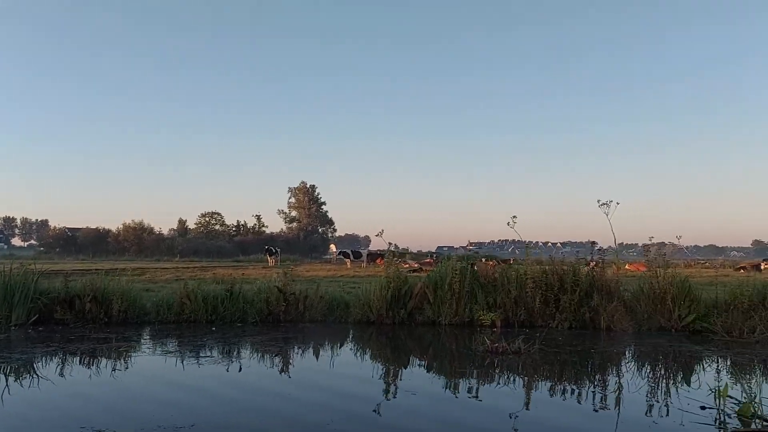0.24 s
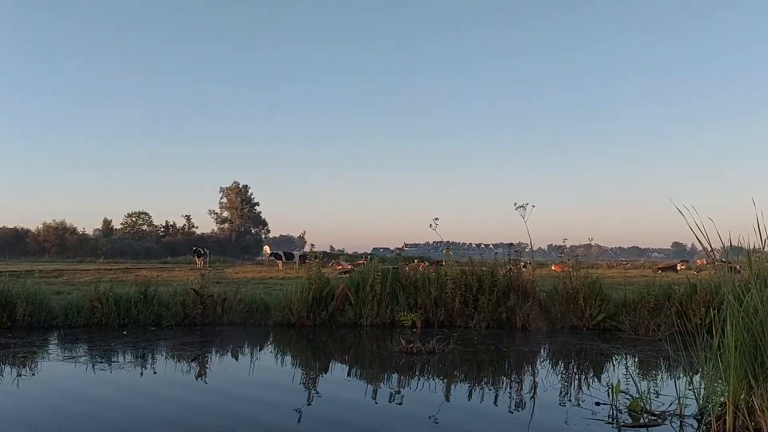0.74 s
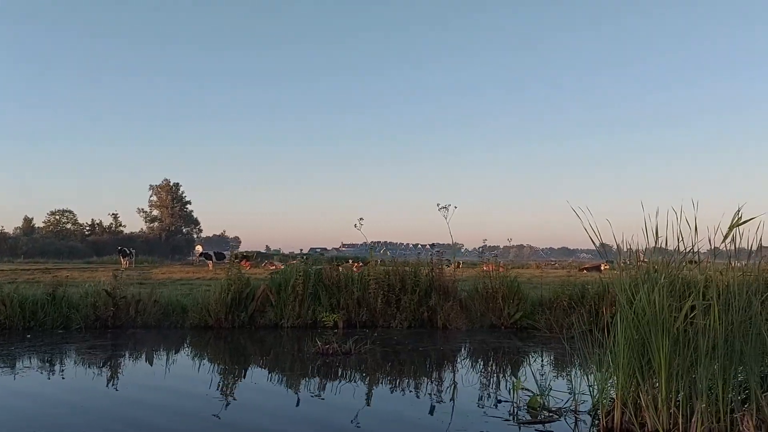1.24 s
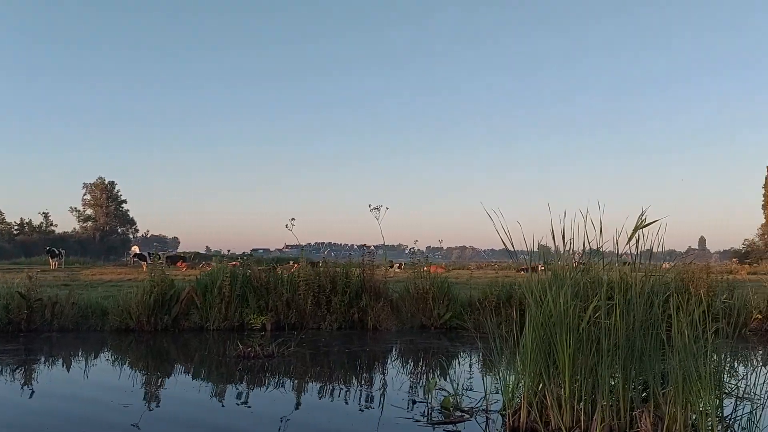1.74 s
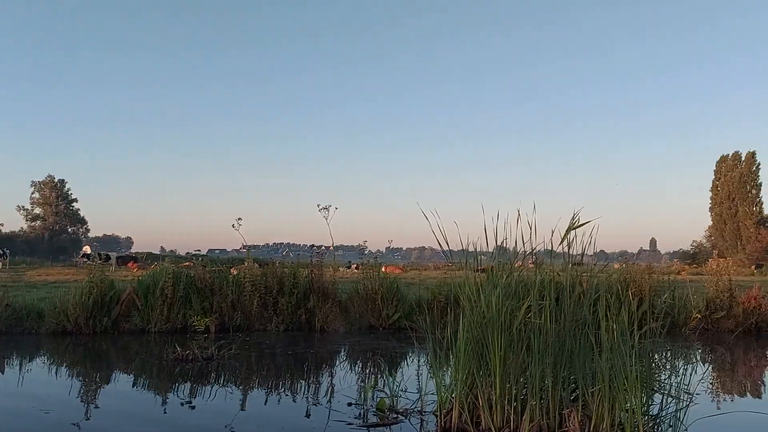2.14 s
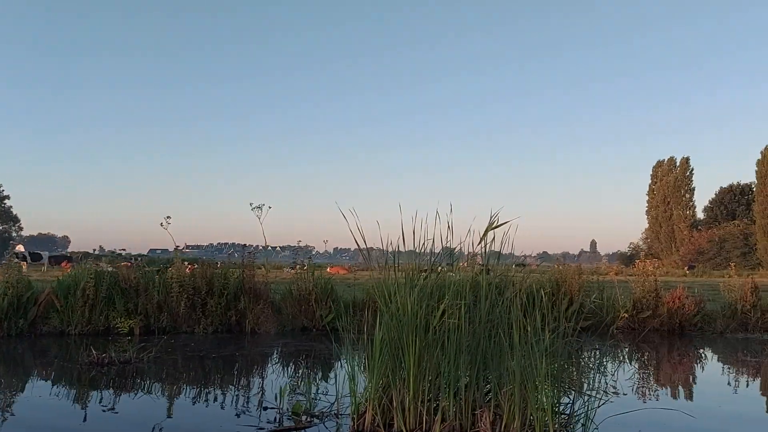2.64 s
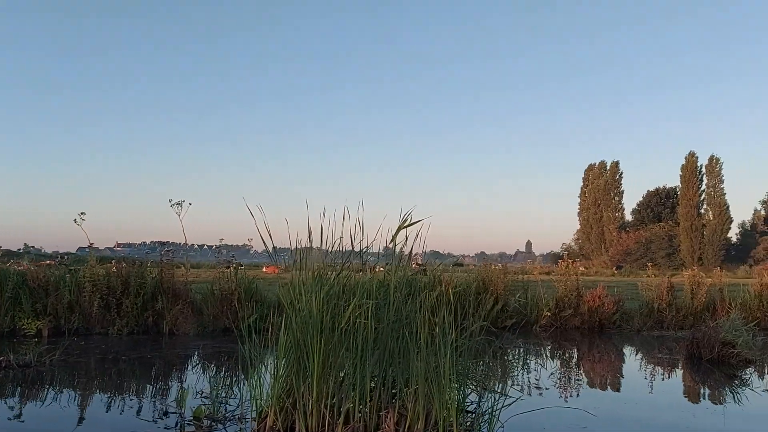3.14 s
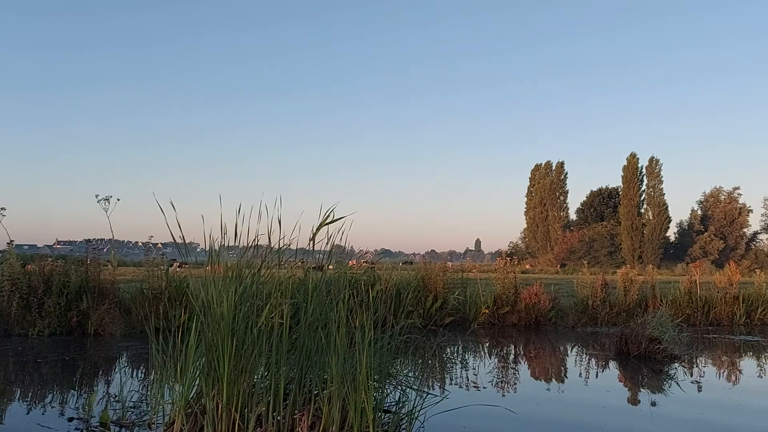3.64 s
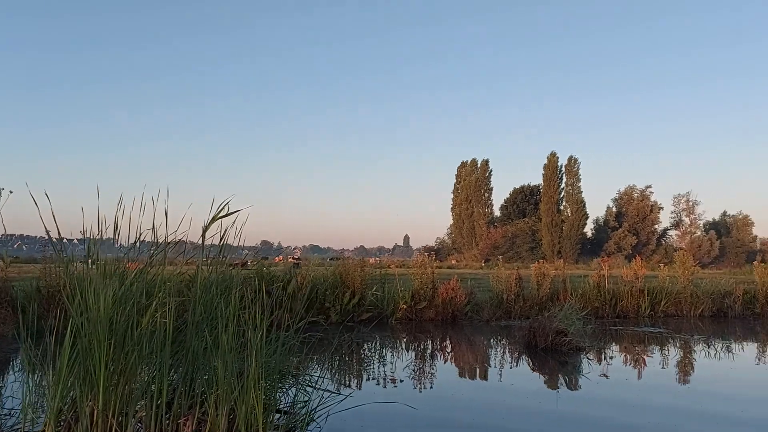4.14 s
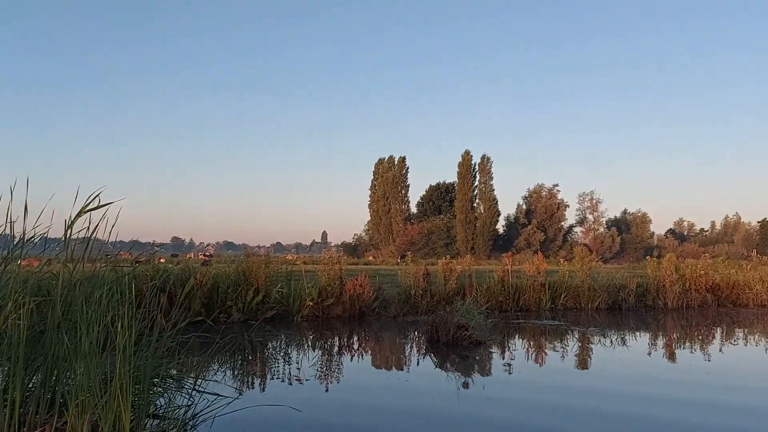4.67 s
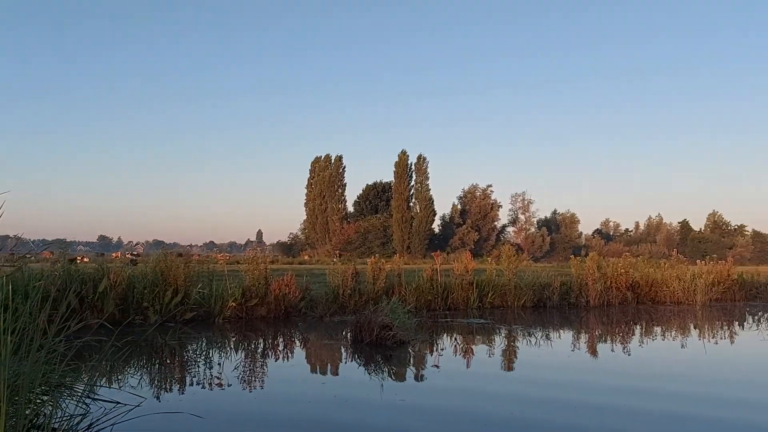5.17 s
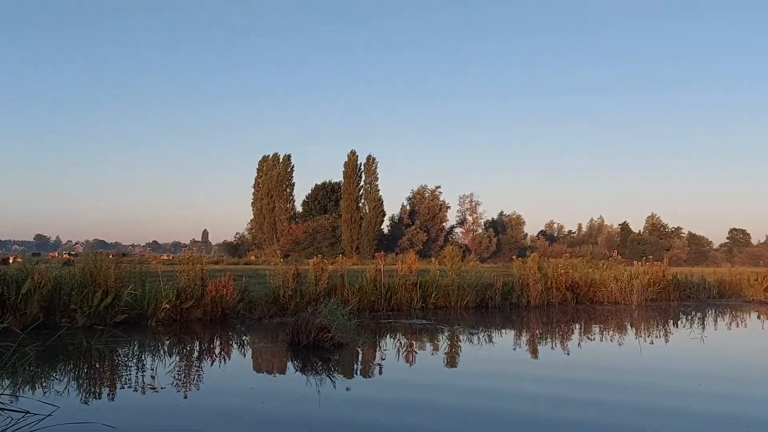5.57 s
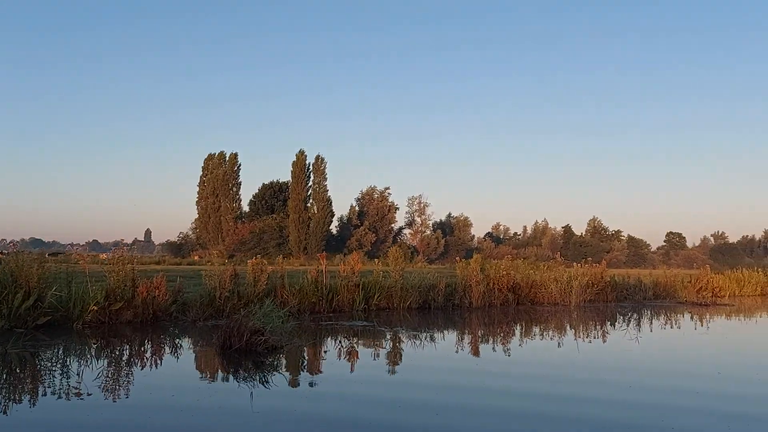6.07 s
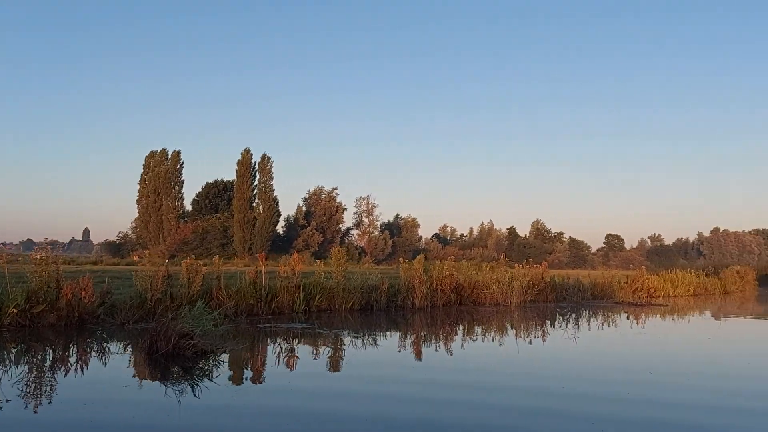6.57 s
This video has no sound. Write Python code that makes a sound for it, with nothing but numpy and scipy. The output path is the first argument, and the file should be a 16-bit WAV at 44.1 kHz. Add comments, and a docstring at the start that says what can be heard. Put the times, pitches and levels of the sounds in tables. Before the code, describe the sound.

From 0 to 6.8 seconds a small four-stroke boat motor idles close by: a low hum near 120 Hz, with brief dips and slight speed wavering, a hollow ringing exhaust around 700 Hz, pulsing hiss and small dry casing ticks. Louder irregular knocks cluster in the first two seconds, then come more sparsely. Short watery plops fall near 1.0, 1.4, 3.0, 3.1, 4.4 and 5.5. At 3.3 a high cow starts softly and hoarsely, climbs steadily from about 150 to 280 Hz, clears near 3.9, then drops and breaks off by 4.45. Hoarse, short far calls follow at 4.45 to 5.1 and again around 5.8 and 6.1. From 6.0 a deep cow begins faintly, strengthening after 6.2, rough and rising from 67 to about 115 Hz, still mooing at the cut. Open waterside, faint bank echoes; the right channel is later and duller. The motor softens slightly around 5.

```python
"""A four-stroke boat motor idles close by on a still waterway: low hum, ringing pipe, hiss and casing knocks.
Short plops of resonant noise come now and then from the first second on.
A high cow moos halfway through; hoarse far calls, noise in one resonance, start as she ends.
A low cow moos at the end; both voices are fold pulses through a moving throat, with echoes.
Of two microphone ports, the right hears motor and cows later and duller."""
import sys
import numpy as np
from scipy import signal
from scipy.fft import rfft, irfft, next_fast_len
from scipy.io import wavfile

SR = 44100
rng = np.random.default_rng(int(sys.argv[2]) if len(sys.argv) > 2 else 0)


def voltage_ratio(level):
    """Linear amplitude factor for a level in decibels (scalar or array-like)."""
    return 10 ** (np.asarray(level, float) / 20)


def master(y):
    """Save y as 16-bit WAV."""
    cut = np.clip(np.atleast_2d(y).T, -1, 1)
    pcm = np.round(cut * 32767)  # scale
    wavfile.write(sys.argv[1], SR, pcm.astype(np.int16))


N = 300321

# Moos. Each row: time in seconds, pitch in Hz, effort in dB rms of the voice below 700 Hz,
# posture 0-2, mouth opening in dB, hoarseness 0-1.
MOO_HIGH = [(3.28, 145.2, -47, 0, -6, 0), (3.342, 152.9, -38, 0.41, -6, 0),
            (3.354, 153.6, -32, 0.12, -0.5, 0.7), (3.496, 167.9, -28, 0.21, 2, 0.49),
            (3.6, 212.3, -25.5, 0.72, 2, 0.85), (3.67, 229.4, -21, 0.47, -3, 0.94),
            (3.84, 251.3, -21, 0.51, 2, 0.55), (3.89, 259, -20, 0.67, -0.5, 0),
            (4.16, 276, -22.5, 0.75, -0.5, 0.2), (4.298, 284, -21.5, 1.06, -6.5, 0.1),
            (4.36, 273.5, -23, 1.05, -2, 0), (4.4, 231, -22, 1.9, 10, 0.2),
            (4.418, 200, -24.5, 2.03, 6, 0.7), (4.43, 168.5, -39, 1.4, 3, 0.5),
            (4.46, 150, -36, 2.0, 4, 0.5)]
MOO_LOW = [(6.0, 66.9, -52, 0.3, -10, 0.022), (6.066, 75.34, -33, 0.02, -8.5, 0.05),
           (6.192, 83.77, -53, 0.02, -8, 0.05), (6.2, 85.5, -28.5, 0.02, -5, 0.5),
           (6.27, 90.15, -29.5, 0.31, -2, 0.79), (6.36, 96.14, -28.5, 0.7, -2, 0.8),
           (6.432, 99.24, -23.5, 1.17, -0.5, 0.44), (6.602, 110.2, -23.5, 1.3, 1.5, 0.25),
           (6.72, 113.6, -25, 1.58, 1.5, 0.41), (6.81, 115.7, -23, 1.14, 1.5, 0.52)]
# Throat colour. Each row: frequency in Hz, relative level in dB in postures 0, 1 and 2.
THROAT_HIGH = [(60, -37, -44, -40), (150, -2, 12, -10), (251, -1.5, 3.5, 14), (503, -0.5, -16, 3.5),
               (664, -18.5, -13, -37), (980, -16, -19, -37), (1135, -7, -20, -17), (1236, -14, -19.5, -25),
               (1365, -35, -29, -41), (1540, -16, -43.5, -39), (1820, -39, -58, -47),
               (2065, -17, -27.5, -29), (2420, -22.5, -36, -28), (2540, -42, -28, -28),
               (2940, -40, -43, -55), (3370, -39, -75, -50), (5000, -49, -61, -60), (9000, -62, -66, -80)]
THROAT_LOW = [(40, -25, -36, -51), (104, -7.5, -15, -19), (200, 1.5, -2.5, 0), (324, -4.5, 4.5, -2),
              (385, -11, -18.5, -9), (517, -7.5, 5, -3.5), (747, -26, -22.5, -9), (870, -5, -1, 3),
              (1144, -6, -5.5, -6), (1290, -19, -18, -5), (1450, -9.5, -16, -32), (1670, -22, -25.5, -32),
              (1945, -23, -29.5, -25), (2090, -54, -42, -12), (2236, -29, -19.5, -17),
              (2440, -38, -26, -10), (2700, -27, -22.5, -28), (3000, -44, -32, -33), (3100, -46, -25, -26),
              (3340, -39, -43, -44), (3660, -27, -29, -32), (4140, -38, -41, -25), (4260, -29, -26.5, -29),
              (4800, -38, -42, -27), (5050, -45, -46, -65), (9000, -57, -48.5, -58)]
# Breath against voice: dB when clear, dB gained when fully hoarse.
BREATH_DB, BREATH_GAIN_DB = -28.5, 24
# Half-pitch lines, before moo() scales the dB by 1.55-2: when clear, gained when fully hoarse.
HALF_DB, HALF_GAIN_HIGH_DB, HALF_GAIN_LOW_DB = -43.5, 36, 3
# Bearing of the cows. Each row: frequency in Hz, right port dB on top of SHADOW for the high cow, the low cow.
COW_SIDE = [(100, 0, 6), (298, 0, -0.5), (700, 0, -1), (1030, 2.5, 0), (1450, 3.5, 8.5), (2000, 2.5, 6.5),
            (2520, 2.5, 7), (3180, 1, 6), (4400, 8, 4)]
# Extra lag at the right port in samples: high cow, low cow.
COW_LAG_SAMPLES = (5.15, 0.28)

# Crank speed. Each row: time in seconds, turns per second.
CRANK = [(0.0, 30.3), (0.5, 30.24), (1.25, 29.45), (1.5, 30.07), (2.0, 30.43), (2.5, 29.87), (3.0, 30.13),
         (3.25, 29.43), (4.0, 29.93), (4.5, 31.24), (5.0, 30.17), (5.5, 30.29), (6.5, 29.52), (6.81, 29.59)]
FIRING_TURNS = -0.04   # crank angle of the firing
# The listener turns. Each row: time in seconds, motor level in dB, lag of the right port in samples.
LISTENER_TURN = [(0, 1, 23.1), (1.5, 1, 22.6), (3, 0.58, 20.4), (4.2, 0.9, 20), (4.7, -1.9, 19.1),
                 (5.0, -2.5, 18.8), (5.6, -1.5, 17.5), (6.1, 0, 17), (6.81, 1, 17.7)]
# Exhaust hum. Each row: multiple of crank speed, dB rms at motor level 0, polarity.
HUM = [(2, -53, -1), (3, -36.5, 1), (4.5, -59, -1), (5, -45, -1), (6, -64, 1), (6.5, -79, -1),
       (7, -44.5, 1), (8, -47.5, 1), (11, -49, 1), (13.5, -65, -1), (14, -57.5, -1)]
# Fourth multiple: dB rms at motor level 0 outside dips, dB per dB of motor level.
BOOM_DB, BOOM_FOLLOWS = -31, 1.3
# Brief dips of the boom. Each row: centre in seconds, depth in dB (negative lifts), half length in seconds.
BOOM_DIPS = [(.13, 23, 0.064), (0.43, 5, 0.081), (1.17, 2, 0.3), (2.406, 19, 0.12), (2.863, 14, 0.06),
             (3.703, 28, 0.066), (4.305, 5.5, 0.058), (4.89, 4, 0.12), (5.08, 10.5, 0.18), (5.44, 16, 0.11),
             (5.599, 16, 0.081), (5.745, 9, 0.046), (5.885, 5.5, 0.11), (6.625, -1, .08), (6.81, 24, 0.064)]
# Exhaust pipe: resonance, decay, dB rms at motor level 0, second puff's peak against the first.
PIPE_HZ, PIPE_T60_S, PIPE_DB, SECOND_PUFF_DB = 688, 0.12, -48, 0.5
# Casing modes. Each row: frequency in Hz, relative drive in dB, t60 in seconds.
CASING = [(1470, 1.5, 0.01), (1770, 2, 0.0045), (2430, -1, 0.014), (3280, -14, 0.0088), (3590, 7.5, 0.0033),
          (4430, 2.5, 0.0024), (8200, -3, 0.0023), (12100, -10, 0.019), (15100, -7, 0.014)]
# Loud knocks. Each row: start in seconds, drive in dB, drive of the modes below 3 kHz in relative dB.
KNOCKS = [(0.1211, -50, -13), (0.383, -33, -18), (0.5251, -23.5, -7), (0.6257, -34.5, -3),
          (0.6845, -47, -9), (0.7256, -36, -10), (0.779, -40, -6), (0.9178, -40, -10), (0.9906, -47, -7),
          (1.096, -44, -9), (1.264, -32, -12), (1.3685, -45, -18), (1.5989, -39, 2.5), (1.7298, -30.5, -2),
          (1.8612, -35, -4), (1.931, -29, -11), (2.0616, -48, 8), (2.728, -37.5, -7), (2.9638, -38, -25),
          (3.0395, -34, -16), (3.223, -33.5, -21), (3.262, -33, -7), (3.802, -36, -8), (4.204, -40, -15),
          (4.334, -39, -5), (4.462, -37.5, -6), (5.1711, -32.5, -20), (5.25, -35, -20), (5.443, -40, -4),
          (5.6747, -35, -7), (5.7113, -29.5, -16), (6.0427, -42, -5)]
# Motor and water noise, left port. Each row: frequency in Hz, dB per Hz at motor level 0 before chuffing.
RUMBLE = [(30, -82), (60, -67), (100, -58.5), (160, -57.5), (250, -64.5), (400, -66.5), (520, -76.5),
          (800, -78), (1100, -82.5), (1450, -83.5), (2000, -91), (2600, -93.5), (3200, -94), (5000, -100)]
# Hiss spectrum. Each row: frequency in Hz, relative level in dB.
HISS = [(2500, 16), (4000, 8), (5200, -11), (7800, 13.5), (9700, 1), (12000, 15), (14000, -2), (16000, -18)]
# Reference for hiss and small knocks: dB, dB per dB of motor level, dB per sample of lag over its mean.
TREBLE_REF_DB, TREBLE_FOLLOWS, TREBLE_DB_PER_LAG = -63, 1, 0.78

# Hoarse far calls. Each row: crest in seconds, resonance in Hz, dB rms at the crest.
FAR_CALLS = [(4.45, 1420, -49), (4.605, 1430, -39), (4.84, 1443, -45.5), (5.06, 1330, -40.5),
             (5.83, 1390, -46.5), (6.08, 1500, -49)]
FAR_RISE_DB_PER_S, FAR_FALL_DB_PER_S, FAR_T60_S = 127, 130, 0.024
# Plops. Each row: start in seconds, length in seconds, resonance in Hz, dB rms at the crest.
PLOPS = [(0.987, 0.015, 3270, -45.5), (1.365, 0.012, 3860, -48), (2.962, 0.012, 3940, -40.5),
         (3.089, 0.03, 1450, -35.5), (4.394, 0.083, 1204, -41.5), (5.492, 0.023, 1200, -43)]
# Right port. Each row: frequency in Hz, dB against the left.
SHADOW = [(60, -1.5), (200, -1), (280, -4), (350, -1), (700, -3), (1200, -9), (2000, -5), (3100, -7.5),
          (3900, -9), (4900, -21), (6200, -24), (16000, -62)]
# Noise of the right port alone. Each row: frequency in Hz, dB on its own wash draw ahead of SHADOW.
UNLIKE = [(30, -4), (55, 2), (100, -12), (600, -4.5), (2000, 8.5), (5000, -0.5)]


def rms_one(x):
    """Scales to rms 1."""
    return x / np.sqrt(np.mean(x ** 2) + 1e-20)


def in_time(rows):
    """Interpolates each column over the first, in seconds."""
    s, *columns = np.transpose(rows)
    return [np.interp(np.arange(N) / SR, s, c) for c in columns]


def at_hz(points, hz):
    """Interpolates dB over log frequency."""
    corners_hz, level_db = np.array(points).T[:2]
    return np.interp(np.log(hz + 1), np.log(corners_hz), level_db)


def colour(x, points):
    """Weights the spectrum by a table of dB."""
    size = next_fast_len(N + 8192)
    gain = voltage_ratio(at_hz(points, np.fft.rfftfreq(size, 1 / SR)))
    return irfft(rfft(x, size) * gain, size)[..., :N]


def highpass(x, cutoff_hz):
    """Second-order Butterworth high-pass."""
    return signal.sosfilt(signal.butter(2, cutoff_hz, "high", fs=SR, output="sos"), x)


def drift(rate_hz):
    """Slow random curve of rms 1: noise through a double pole, at a fortieth of the sample rate."""
    r = np.exp(-2 * np.pi * rate_hz * 40 / SR)
    slow = signal.lfilter([1], [1, -2 * r, r * r], rng.standard_normal(N // 40 + 2002))[2000:]
    return np.interp(np.arange(N) / 40, np.arange(len(slow)), rms_one(slow))


def ring(clicks, hz, t60_s):
    """Two-pole resonator: a unit click starts a decaying sine of height 1."""
    r, w = voltage_ratio(-60 / (t60_s * SR)), 2 * np.pi * hz / SR
    return signal.lfilter([0, np.sin(w)], [1, -2 * r * np.cos(w), r * r], clicks + 1e-18)


def causal(hz, level_db):
    """Complex log response in 5 Hz steps, with the phase of a resonator that rings only once struck."""
    cepstrum = irfft(np.log(voltage_ratio(at_hz(np.c_[hz, level_db], np.arange(2049) * 5))))
    cepstrum[1:2048] *= 2
    cepstrum[2049:] = 0
    return rfft(cepstrum)


def moo(rows, throat, half_gain_db):
    """Fold pulses ring a throat moving through three postures; uneven cycle pairs add half-pitch lines."""
    span = slice(round(rows[0][0] * SR), min(N, round(rows[-1][0] * SR)))
    pitch_hz, effort_db, posture, mouth_db, hoarse = (c[span] for c in in_time(rows))
    half_db = HALF_DB + half_gain_db * hoarse
    breath_db = BREATH_DB + BREATH_GAIN_DB * hoarse
    jitter = (0.002 + 0.012 * hoarse ** 2) * drift(60.0)[span]
    cycles = np.cumsum(pitch_hz * (1 + jitter)) / SR

    corners_hz, *postures_db = np.transpose(throat)
    shares = [np.maximum(0, 1 - abs(posture.clip(0, 2) - p)) for p in range(3)]
    shapes = [causal(corners_hz, db) for db in postures_db]
    grid_hz = np.arange(2049) * 5
    voice, power = 0, 0
    for k in range(1, int(12000 / pitch_hz.min())):
        hz = k * pitch_hz / 2                          # odd k: half-pitch lines
        opened = np.clip(np.log2(hz / 500), 0, 1)      # an open mouth lets the upper partials out
        shape = sum(share * np.interp(hz, grid_hz, s) for share, s in zip(shares, shapes))
        line_db = half_db * (k % 2) * (2 - 0.45 * opened)
        gain = np.exp(shape.real) * voltage_ratio(opened * mouth_db + line_db) * (hz < 6000)
        voice = voice + gain * np.cos(np.pi * k * cycles + shape.imag)
        power = power + gain ** 2 * (hz < 700) / 2

    tilt_db = 5.5 * np.log2(corners_hz)                # breath is brighter than the voice
    airs = [rms_one(colour(rng.standard_normal(N), np.c_[corners_hz, db + tilt_db]))[span]
            for db in postures_db]
    breath = sum(share * air for share, air in zip(shares, airs))
    breath = breath * voltage_ratio(breath_db + mouth_db) * (1 + 0.45 * np.sin(2 * np.pi * cycles))
    out = np.zeros(N)
    out[span] = (voice / np.sqrt(power) + breath) * voltage_ratio(effort_db + 0.45 * drift(44.0)[span])
    return out


def shore_echoes(x):
    """Close scatter off water and reeds spreads the treble; later echoes come off banks and trees."""
    out = x.copy()
    treble = highpass(x, 1600.0)
    for lag in (rng.uniform(0.0015, 0.008, 5) * SR).astype(int):
        out[lag:] += treble[:-lag] * voltage_ratio(-14.0) * rng.choice([-1, 1])
    for lag in (rng.uniform(0.02, 0.25, 14) * SR).astype(int):
        out[lag:] += x[:-lag] * voltage_ratio(-23.0 - 50.0 * lag / SR) * rng.choice([-1, 1])
    return out


def hum(turns, motor_db):
    """Multiples of crank speed, each at a crest or trough at the firing, wavering a little."""
    t = np.arange(N) / SR
    dips_db = sum(depth_db * np.maximum(0, 1 - abs(t - s) / half_s) for s, depth_db, half_s in BOOM_DIPS)
    boom_db = BOOM_DB + BOOM_FOLLOWS * motor_db - dips_db + 1.35 * drift(5.5)
    out = np.sqrt(2) * voltage_ratio(boom_db) * np.cos(2 * np.pi * 4 * turns)
    for multiple, level_db, sign in HUM:
        wobble_rad = 0.04 * multiple * drift(2.0)
        height = np.sqrt(2) * voltage_ratio(level_db + motor_db + 2.0 * drift(0.8))
        # whole and half multiples only
        out += np.sign(sign) * height * np.cos(np.pi * round(2 * multiple) * turns + wobble_rad)
    return out


def pipe(turns, motor_db):
    """Two noise puffs per two turns, one broad and one short, ring the exhaust pipe."""
    broad = np.exp(1.0 * (np.cos(np.pi * (turns - 0.5)) - 1))
    short = np.exp(7.1 * (np.cos(np.pi * (turns - 1.8)) - 1))
    puffs = broad + voltage_ratio(SECOND_PUFF_DB) * short
    blown = ring(puffs * rng.standard_normal(N), PIPE_HZ, PIPE_T60_S)
    return voltage_ratio(PIPE_DB + motor_db) * rms_one(blown)


def knocks(turns, treble_db):
    """Firings, loose parts and loud knocks shake the casing: a noise crack, and a 3 ms rattle in its modes."""
    fired = np.flatnonzero(np.diff(np.floor(turns)) > 0)
    loose = rng.integers(0, N, 250)                    # loose parts tick at any time
    chance = np.minimum(rng.exponential(1, len(fired)), 2.5)
    even = np.floor(turns[fired]) % 2 == 0             # every second firing is weaker
    fired_db = treble_db[fired] + 15.0 + 2.0 * chance - 0.47 * even
    loose_db = treble_db[loose] + 8.5 + 2.0 * np.minimum(rng.exponential(1, len(loose)), 1.8)
    small_db = np.r_[fired_db, loose_db]

    loud_s, loud_db, loud_low_db = np.transpose(KNOCKS)
    at = np.r_[fired + rng.integers(-90, 90, len(fired)), loose, np.round(loud_s * SR).astype(int)]
    at = at.clip(0, N - 1)
    top_db = np.r_[small_db, loud_db]
    low_db = np.r_[np.full(len(small_db), -4.0), loud_low_db]

    rattle = np.exp(-np.arange(400) / (0.0028 * SR))
    clicks = np.zeros(N)
    clicks[at] = voltage_ratio(top_db - 1.1)
    crack = signal.oaconvolve(clicks, rattle ** 4.3)[:N] * rng.standard_normal(N)
    out = highpass(crack, 3000.0)
    for hz, level_db, t60_s in CASING:
        spread_db = rng.normal(0, 3.64, len(at))
        clicks[at] = voltage_ratio(top_db + level_db - 25.0 + (low_db + 10.5) * (hz < 3000) + spread_db)
        shaken = signal.oaconvolve(clicks, rattle)[:N] * rng.standard_normal(N)
        out += ring(shaken, hz, t60_s)
    return out


def wash(turns, motor_db, treble_db):
    """Two unrelated draws of rumble, its upper part chuffing by chance, and hiss that swells once a turn."""
    rumble = colour(rng.standard_normal((2, N)), RUMBLE) * np.sqrt(SR / 2)   # density per Hz
    rumble = rumble * voltage_ratio(motor_db + 1.0 * drift(14.0))
    upper = highpass(rumble, 1100.0)
    depth_db = 2.0 * (-0.5 + 2.3 * drift(28.0))        # either sign
    chuff = voltage_ratio(depth_db * np.cos(2 * np.pi * (turns - 0.02)) + 1.67 * drift(75.0))
    swell_db = 2.8 * np.cos(2 * np.pi * (turns - 0.8)) + 1.0 * drift(25.0)
    hiss = rms_one(colour(rng.standard_normal((2, N)), HISS)) * voltage_ratio(treble_db + 4.5 + swell_db)
    return rumble + upper * (chuff - 1) + hiss


def plops():
    """Short puffs of noise in one resonance each."""
    t, out = np.arange(N) / SR, np.zeros(N)
    for start_s, length_s, hz, level_db in PLOPS:
        shape = np.sin(np.pi * np.sqrt(np.clip((t - start_s) / length_s, 0, 1)))
        out += voltage_ratio(level_db) * shape * rms_one(ring(rng.standard_normal(N), hz, 0.0068))
    return out


def far_calls():
    """Noise in one resonance each, swelling and fading at constant dB per second."""
    t, out = np.arange(N) / SR, np.zeros(N)
    for crest_s, hz, level_db in FAR_CALLS:
        slope_db_per_s = np.where(t < crest_s, FAR_RISE_DB_PER_S, FAR_FALL_DB_PER_S)
        envelope = voltage_ratio(level_db - slope_db_per_s * abs(t - crest_s))
        out += envelope * rms_one(ring(rng.standard_normal(N), hz, FAR_T60_S))
    return out


def scene():
    """Left port direct; right port late and shadowed, the cows at their own bearing."""
    turns = np.cumsum(in_time(CRANK)[0]) / SR - FIRING_TURNS
    motor_db, lag = in_time(LISTENER_TURN)
    treble_db = TREBLE_REF_DB + TREBLE_FOLLOWS * motor_db + TREBLE_DB_PER_LAG * (lag - lag.mean())
    cows = [moo(MOO_HIGH, THROAT_HIGH, HALF_GAIN_HIGH_DB), moo(MOO_LOW, THROAT_LOW, HALF_GAIN_LOW_DB)]
    noise = wash(turns, motor_db, treble_db)
    motor = hum(turns, motor_db) + pipe(turns, motor_db) + knocks(turns, treble_db)
    near = motor + noise[0] + plops() + far_calls()

    now = np.arange(N)
    late = np.interp(now - lag, now, near)
    hz, *sides_db = np.transpose(COW_SIDE)
    for cow, extra, side_db in zip(cows, COW_LAG_SAMPLES, sides_db):
        late_cow = np.interp(now - lag - extra, now, shore_echoes(cow))
        late += colour(late_cow, np.c_[hz, side_db])
    left = near + shore_echoes(sum(cows))
    right = colour(late + colour(noise[1], UNLIKE), SHADOW)
    return np.array([left, right])


def band_limit(x):
    """A steep low-pass at the top of the band."""
    return signal.sosfilt(signal.butter(12, 16230, fs=SR, output="sos"), x)


def record(dry):
    """Adds microphone self-noise and cuts the top."""
    noisy = dry + voltage_ratio(-78) * rng.standard_normal(dry.shape)
    top_cut = signal.cheby2(12, 60, 16230.4, fs=SR, output="sos")   # stopband edge in Hz
    mix = signal.sosfilt(top_cut, noisy)
    return band_limit(mix)


dry = scene()
out = record(dry)
master(out)
```